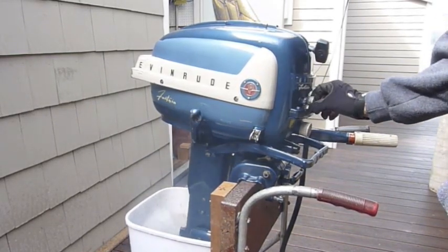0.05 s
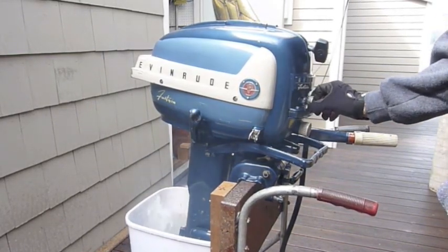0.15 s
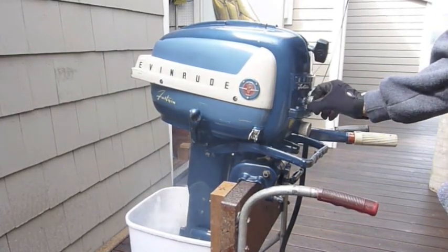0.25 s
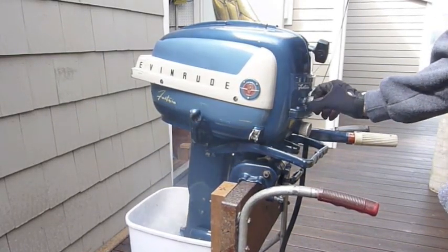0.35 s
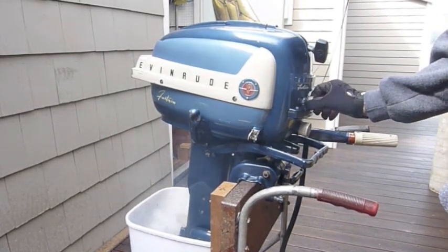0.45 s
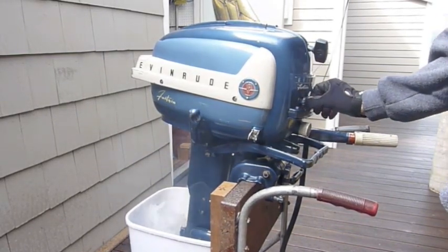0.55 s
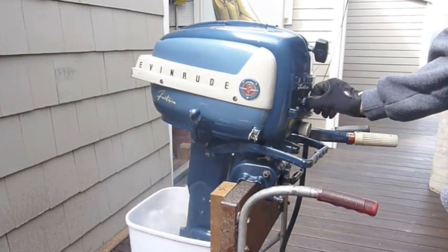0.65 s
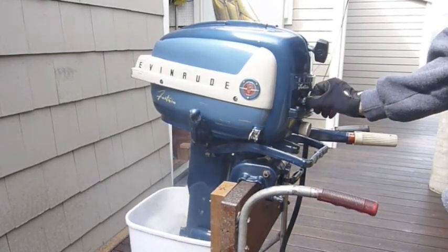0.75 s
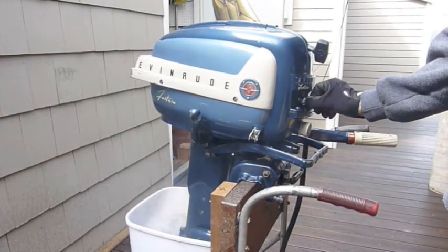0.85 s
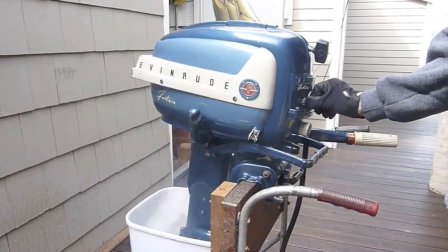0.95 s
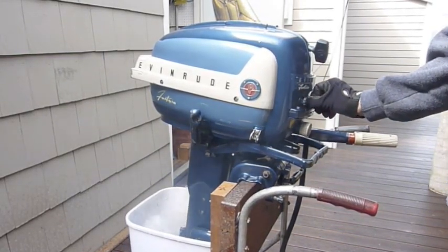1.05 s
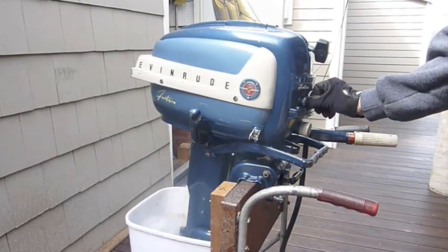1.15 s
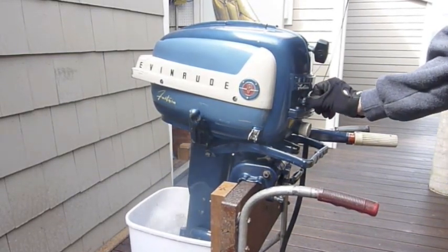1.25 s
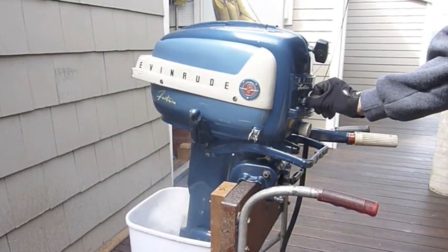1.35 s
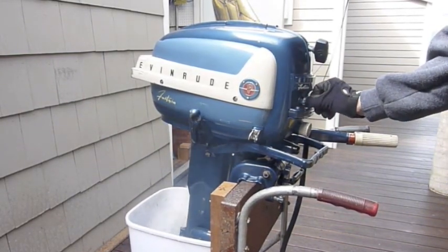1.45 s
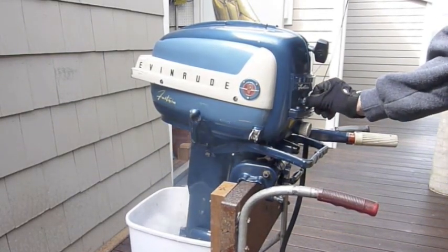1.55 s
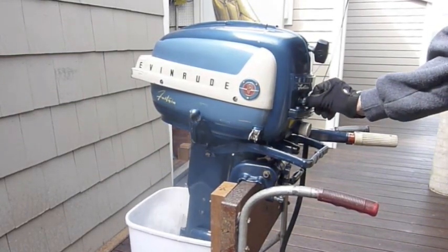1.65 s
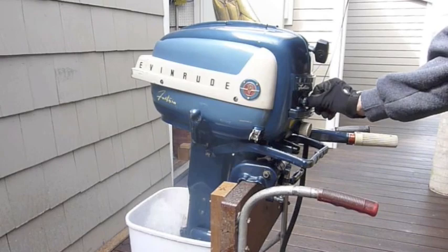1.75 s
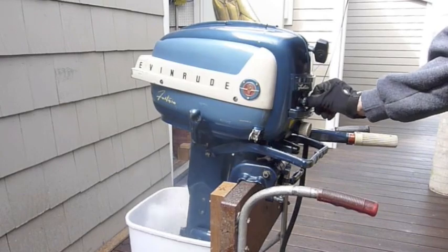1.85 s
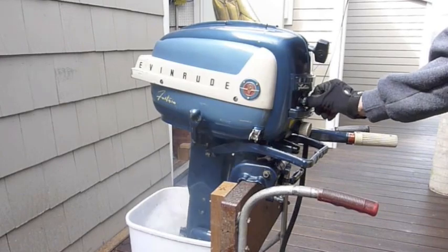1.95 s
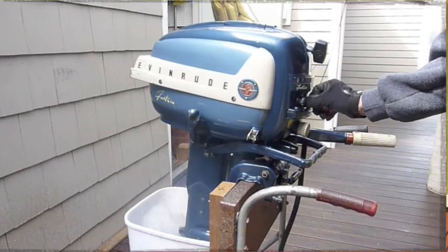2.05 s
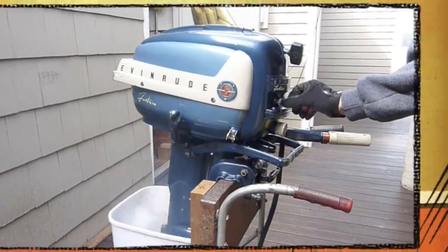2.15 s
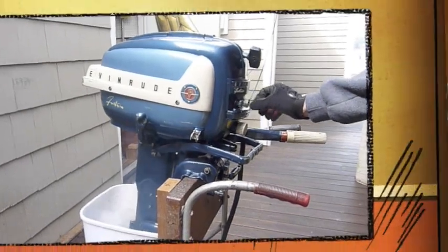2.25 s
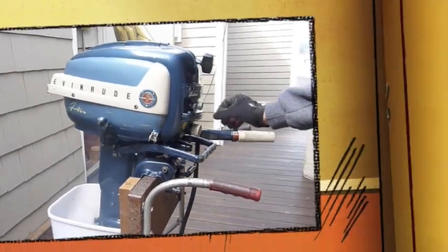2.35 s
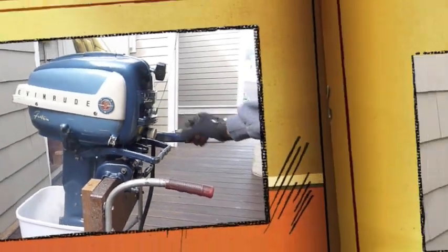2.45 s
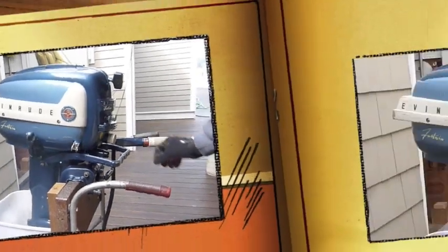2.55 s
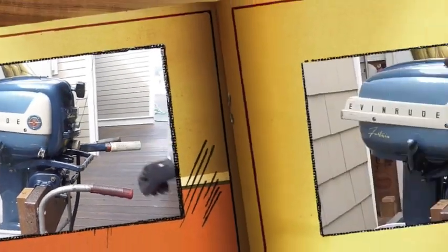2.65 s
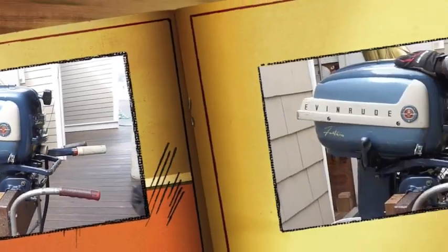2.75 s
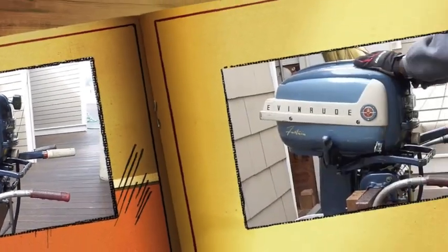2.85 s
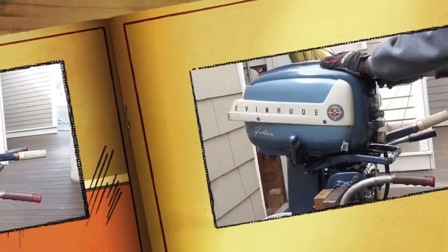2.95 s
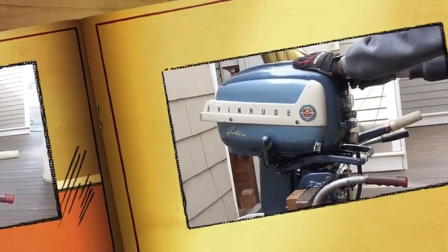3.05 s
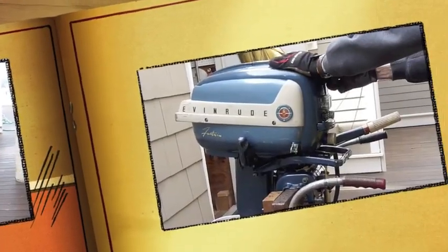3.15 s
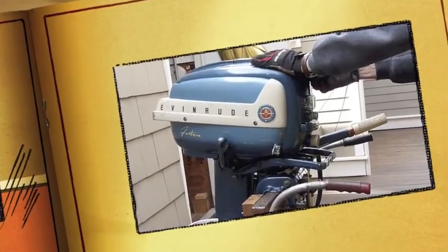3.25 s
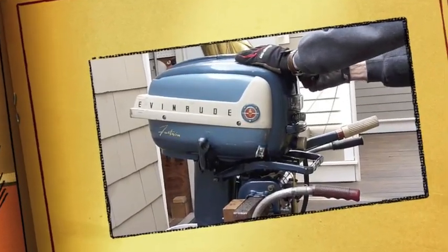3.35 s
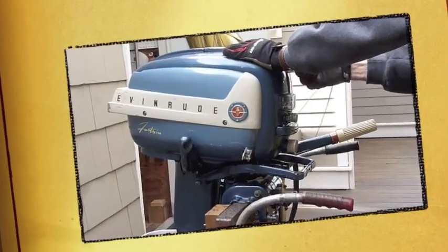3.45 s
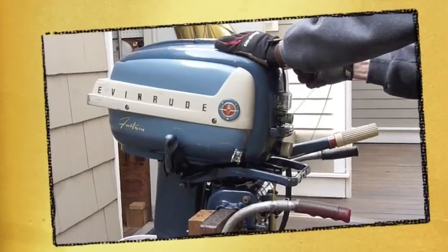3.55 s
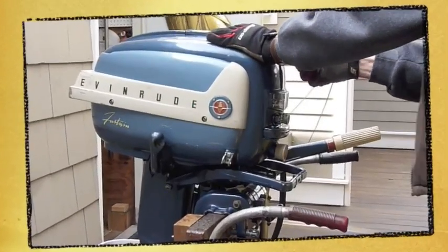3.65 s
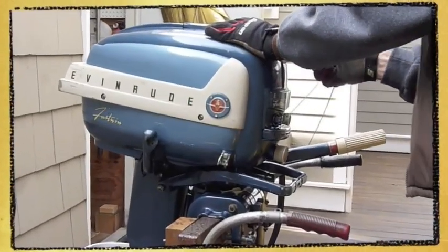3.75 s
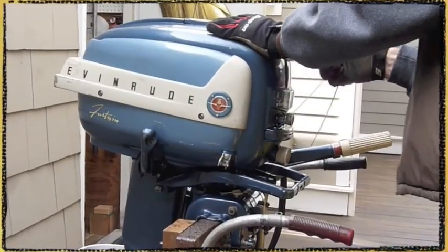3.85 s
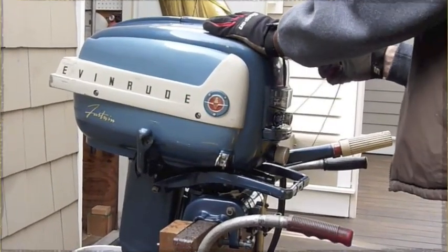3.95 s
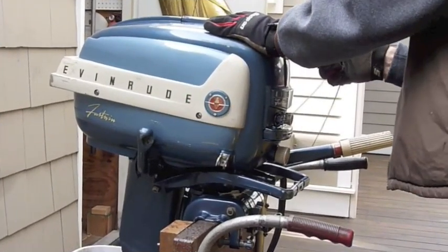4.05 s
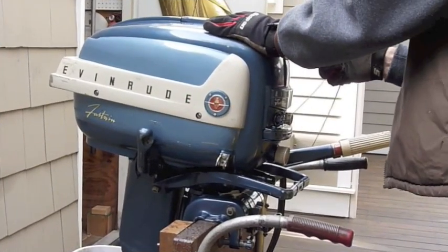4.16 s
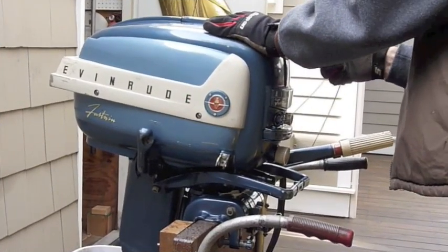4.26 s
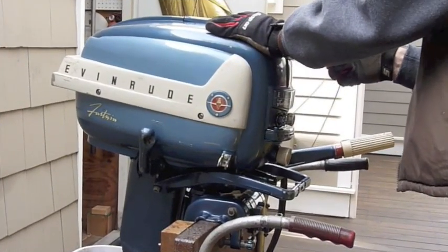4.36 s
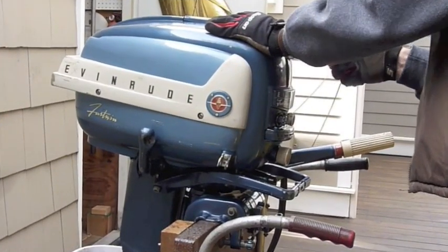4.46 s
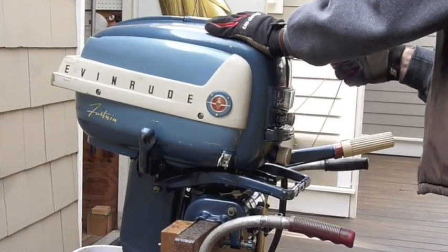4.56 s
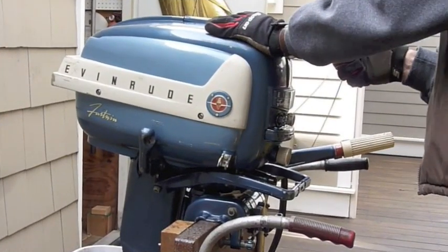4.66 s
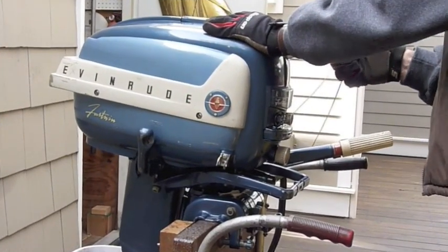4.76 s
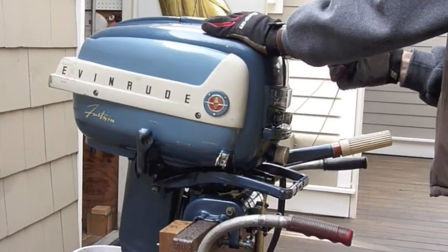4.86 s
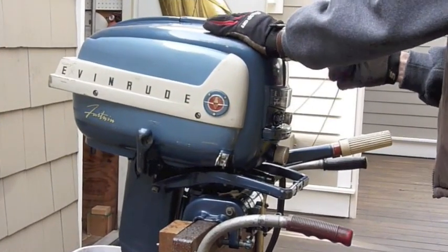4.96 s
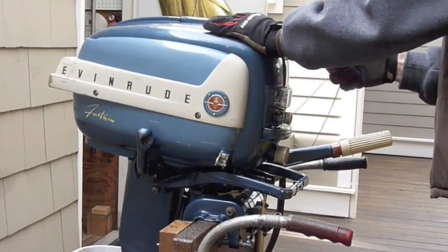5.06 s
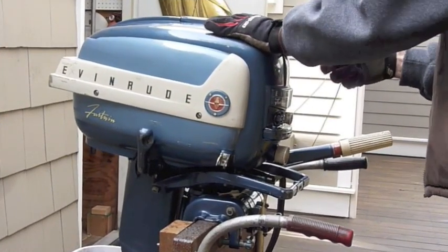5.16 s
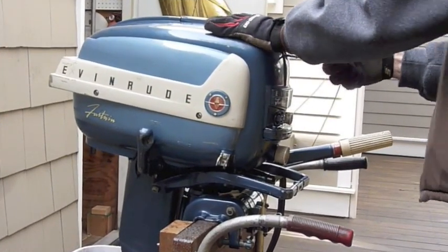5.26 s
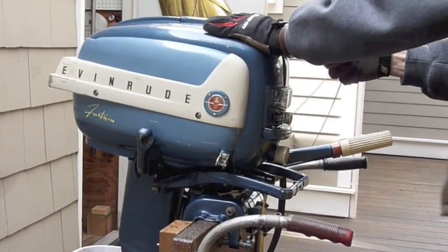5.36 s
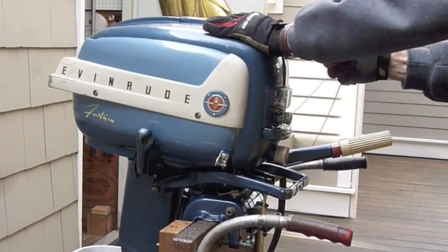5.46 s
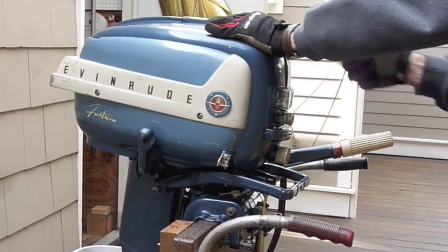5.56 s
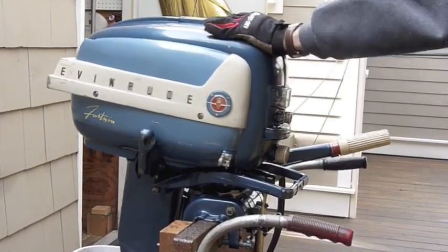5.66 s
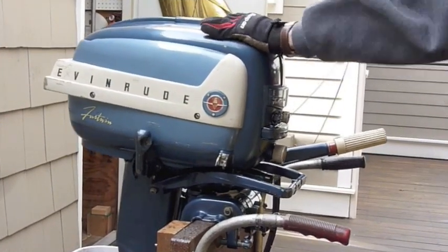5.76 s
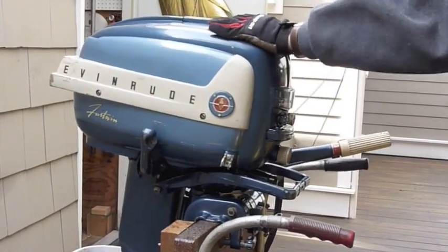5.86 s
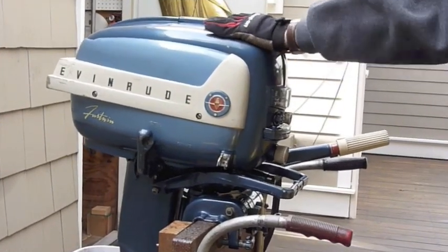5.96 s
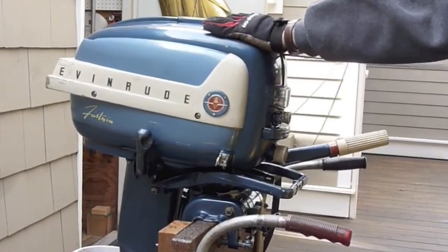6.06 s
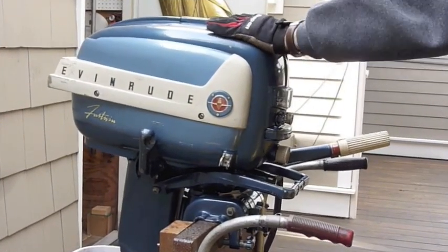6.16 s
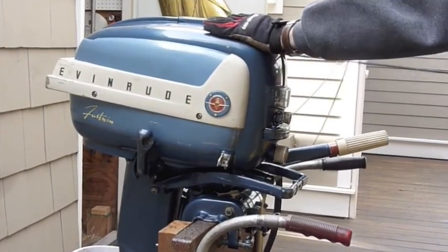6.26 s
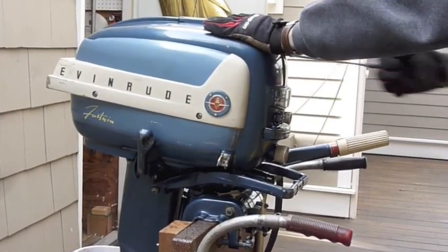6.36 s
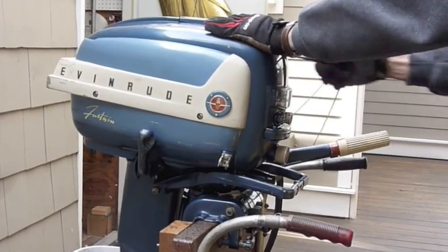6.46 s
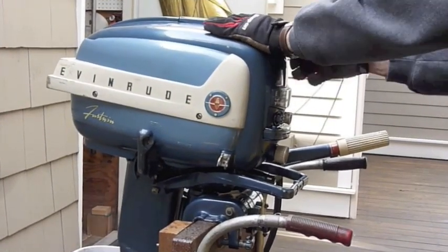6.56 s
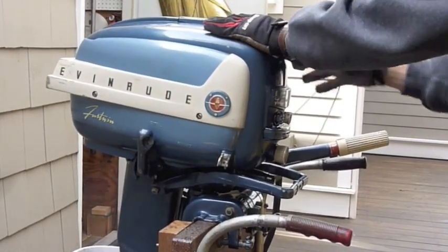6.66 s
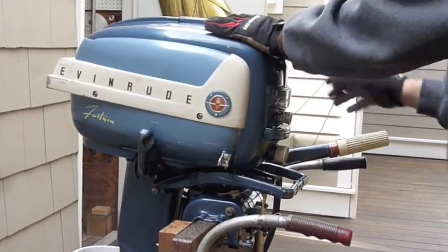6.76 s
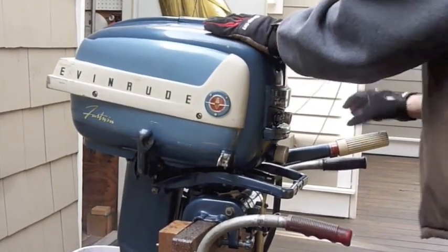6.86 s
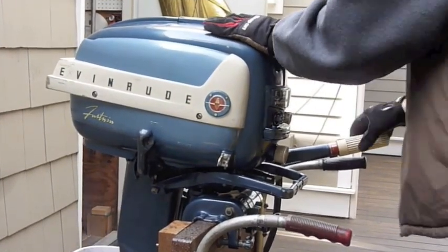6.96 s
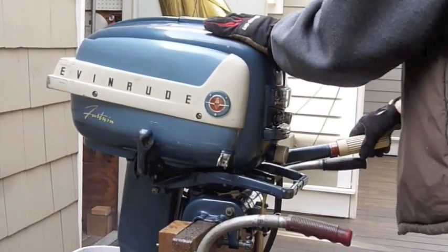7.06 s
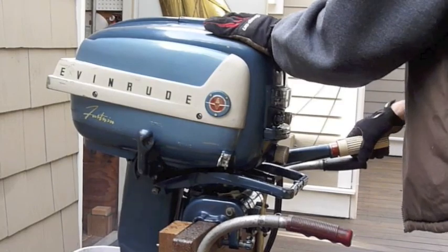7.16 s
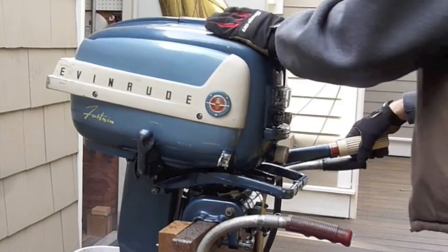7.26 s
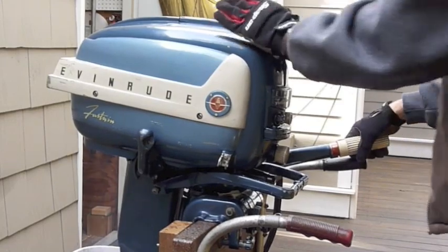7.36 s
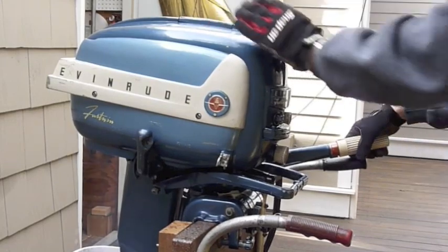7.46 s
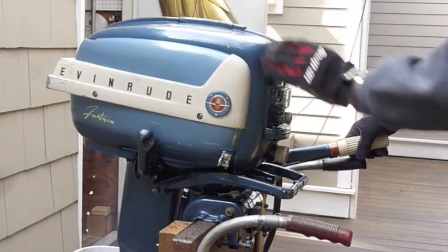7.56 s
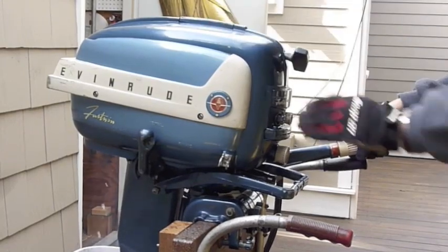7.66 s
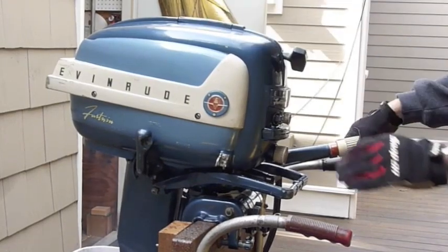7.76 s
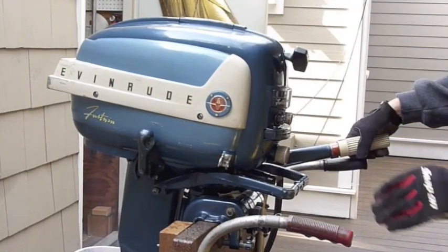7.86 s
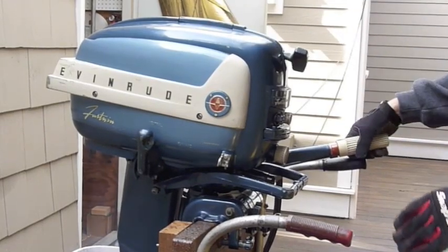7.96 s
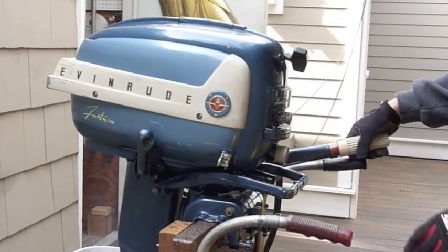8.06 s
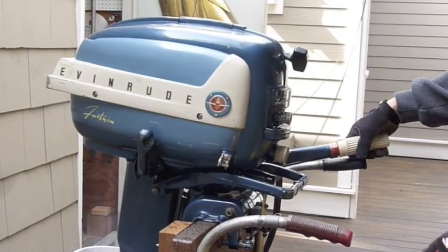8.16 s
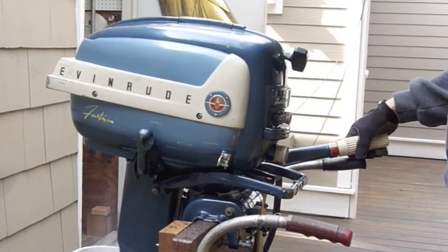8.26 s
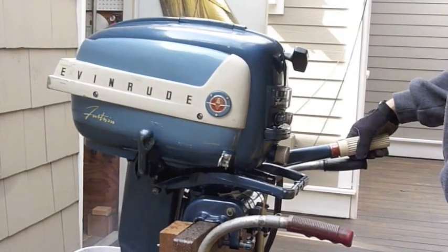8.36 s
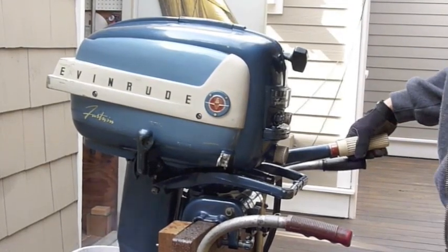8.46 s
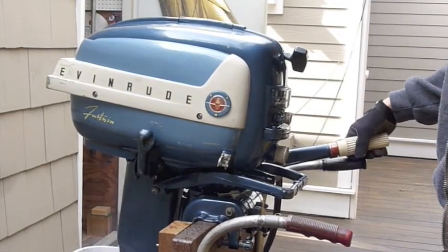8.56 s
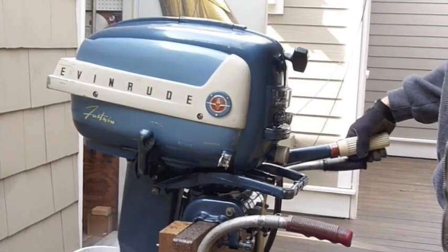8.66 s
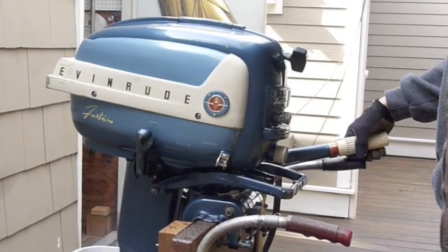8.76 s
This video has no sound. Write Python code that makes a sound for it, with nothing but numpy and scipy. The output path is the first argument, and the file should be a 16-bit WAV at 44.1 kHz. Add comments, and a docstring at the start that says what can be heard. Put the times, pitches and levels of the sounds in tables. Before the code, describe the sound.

Metal rattles and exhaust gurgles through water as a small outboard motor ticks over in a tub beside a house wall. The sound fades out, leaving a quiet gap with soft handling scrapes. Then, nearer the microphone, a starter bites and cranks with a few hard clacks. The engine fires, speeds up slightly and drops back to an uneven, stumbling idle with splashy glugs.

```python
"""A twin two-stroke outboard idles in a tub of water beside a house wall, then fades out.
The sound fades back in, closer, on the stopped motor: a hand works the controls, the electric
starter grinds, the motor catches, races a little and settles to a lumpy idle.
Each firing is a clatter of metal under the cowl and an exhaust puff gurgling through the tub."""
import sys
import numpy as np
from scipy import signal
from scipy.io import wavfile

SR = 44100
rng = np.random.default_rng(int(sys.argv[2]) if len(sys.argv) > 2 else 0)


def to_wav(sig):
    """Store sig (one row per channel, or 1-D mono) as 16-bit WAV at the path in sys.argv[1].

    Samples outside -1..1 are clipped; the rate is SR.
    """
    pcm = np.clip(np.atleast_2d(sig), -1, 1) * 32767
    pcm = np.round(pcm).astype(np.int16)
    wavfile.write(sys.argv[1], SR, pcm.T)  # frames by channels


N = 388080
TIME = np.arange(N) / SR
FADE_BOTTOM_S = 3.099

# firings that catch hard: t/s, relative level/dB
HARD_FIRINGS = [(.423, -15), (.655, -14), (1.238, -11), (1.77, -13), (1.946, -14), (2.085, -16.5),
                (6.191, -15), (6.229, -11.5), (6.283, -11.5), (6.42, -10.5), (6.559, -12.5), (6.595, -13),
                (6.798, -12.5), (6.862, -11), (7.007, -10.5), (7.154, -11.5), (7.227, -13.5),
                (7.306, -13.5), (7.463, -15), (7.623, -14), (7.821, -13), (7.86, -14), (8.029, -12.5),
                (8.205, -10.5), (8.376, -11), (8.45, -12), (8.488, -12), (8.62, -13), (8.78, -13)]
# cowl modes: f/Hz, half-width/Hz, lift/dB
COWL_MODES = [(1130, 35, 3), (1365, 70, 4), (1860, 70, 2), (2650, 90, 3), (3070, 70, 2), (3390, 90, 4),
              (3655, 55, 3), (4220, 80, 3), (6240, 90, 2)]


def amp(db):
    return 10 ** (np.asarray(db) / 20)


def curve(rows, t):
    """Linear interpolation of rows of t/s, value."""
    return np.interp(t, *np.transpose(rows))


def add(mix, at_s, sound):
    part = mix[max(round(at_s * SR), 0):][:len(sound)]
    part += sound[:len(part)]


def body(x, colour, modes=()):
    """Ring x through a minimum-phase body of unit power: broad colour plus narrow modes."""
    freqs = np.fft.rfftfreq(16384, 1 / SR)
    hz, db = np.transpose(colour)
    db = np.interp(np.log(freqs + 1), np.log(hz), db)
    for centre, half_width, lift in modes:
        db = db + lift / (1 + ((freqs - centre) / half_width) ** 2)
    log_gain = np.log(amp(np.r_[db, db[-2:0:-1]]))
    ring = np.fft.ifft(np.exp(signal.hilbert(log_gain).conj())).real[:len(db)]
    return signal.oaconvolve(x, ring / np.linalg.norm(ring))[:N]


def impacts(per_s, spread_db):
    """Dense hail of small, uneven impacts at unit rms."""
    size = rng.standard_normal(N) * amp(spread_db * np.clip(rng.standard_normal(N), -2, 2))
    hail = size * (rng.random(N) < per_s / SR)
    return hail / np.sqrt(np.mean(hail ** 2) + 1e-20)


def crank(speed, first_s, jitter_s):
    """Running firing count and the slightly uneven firing times."""
    cycles = np.cumsum(curve(speed, TIME)) / SR
    cycles -= np.interp(first_s, TIME, cycles)
    total = np.interp(speed[-1][0], TIME, cycles)
    fires_s = np.interp(np.arange(total), cycles, TIME)
    return cycles, fires_s + jitter_s * rng.standard_normal(len(fires_s))


def clatter(fires_s, colour, db, rise_s, decay_s, rattle, hollow_s, knock, scatter_db, hard_db):
    """Firings snap at pistons and loose metal; the hollow cowl answers; gears rattle in between."""
    t = np.arange(SR // 10) / SR
    snap = (1 - np.exp(-(t / rise_s) ** 2)) * np.exp(-t / decay_s)
    swell = t / hollow_s * np.exp(-t / hollow_s)
    snaps, swells, knocks = np.zeros((3, N))
    draws = np.clip(rng.standard_normal((len(fires_s), 4)), -2, 2)
    for s, (size, depth, force, late) in zip(fires_s, draws):
        jolt_db = hard_db * any(abs(s - at_s) < .02 for at_s, _ in HARD_FIRINGS)
        add(snaps, s, amp(jolt_db + scatter_db * size) * snap)
        add(swells, s, amp(jolt_db + scatter_db * (size + depth) / np.sqrt(2)) * swell)
        add(knocks, s + rise_s * (1 + 0.54 * late), np.array([knock * amp(2 * force)]))
    running = (TIME > fires_s[0] - .01) & (TIME < fires_s[-1] + .06)
    bright = (snaps + rattle * running) * impacts(per_s=9000, spread_db=0.5) + knocks
    hollow = (swells + 0.66 * running) * rng.standard_normal(N)
    ringing = clinks(fires_s + rise_s)
    bright, hollow, ringing = (x / np.std(x[running]) for x in (bright, hollow, ringing))
    highs = signal.lfilter(*signal.butter(2, 2000, "high", fs=SR), bright)
    lows = signal.lfilter(*signal.butter(2, 2000, fs=SR), hollow)
    return amp(db) * (body(highs + lows, colour, COWL_MODES) + amp(-15.5) * ringing)


def clinks(times_s, spread_db=9.5):
    """Each stroke rings the cowl modes in a different mix."""
    hz, half_width, lift = np.transpose(COWL_MODES)[:, :, None]
    t, out = np.arange(SR // 12) / SR, np.zeros(N)
    envelopes = np.exp(-np.pi * half_width * t / 2) * (1 - np.exp(-t / 0.0012))
    rings = amp(lift) * np.minimum(hz / 3000, 1) * envelopes
    for s, (size, phase) in zip(times_s, rng.standard_normal((len(times_s), 2, len(hz), 1))):
        gains = amp(spread_db * np.clip(size, -2, 2))
        add(out, s, (gains * rings * np.sin(2 * np.pi * (hz * t + phase))).sum(0))
    return out


def exhaust(fires_s, puff_db, colour, modes, hard_db, lag_s, gurgle, gurgle_s, slap_s, scatter_db):
    """Each firing puffs down the leg; the water slaps back and gurgles; the tub rings."""
    times_s = fires_s + lag_s
    size_db = puff_db + scatter_db * np.clip(rng.standard_normal(len(fires_s)), -2, 1)
    for s, level_db in HARD_FIRINGS:
        size_db[abs(times_s - s) < .02] = level_db + hard_db
    t, drive = np.arange(SR // 12) / SR, np.zeros(N)
    for s, level_db in zip(times_s, size_db):
        bubbles = rng.standard_normal(len(t)) * np.exp(-t / gurgle_s)
        puff = gurgle * bubbles / np.linalg.norm(bubbles)
        puff[0] += 1  # gas pulse
        puff[round(slap_s * SR)] += 0.39
        add(drive, s, amp(level_db) * puff / np.linalg.norm(puff))
    period = np.mean(np.diff(fires_s)) * SR  # one puff carries a whole period's energy
    return body(drive, colour, modes) * np.sqrt(period)


def walls(x, db, t60_s):
    """Deck and house walls return a short scatter of echoes."""
    t = np.arange(SR // 3) / SR
    taps = rng.choice([-1, 1], len(t)) * (rng.random(len(t)) < 2000 / SR)
    echoes = taps * (t > .004) * 10 ** (-3 * t / t60_s)
    return amp(db) * signal.oaconvolve(x, echoes / np.linalg.norm(echoes))[:N]


def shake(cycles, orders, waver=0.55):
    """The motor rocks unevenly on its stand at low multiples of the firing rate."""
    knots_s, out = np.arange(0, TIME[-1] + .1, .1), np.zeros(N)
    for order, db in orders:
        sway = 1 + waver * np.interp(TIME, knots_s, rng.standard_normal(len(knots_s)))
        out += amp(db) * sway * np.sin(2 * np.pi * (order * cycles + rng.random()))
    return np.sqrt(2) * out


def idle():
    """The motor ticks over, exhaust bubbling loosely, until the bottom of the fade."""
    # engine speed: t/s, firing rate/Hz
    speed = [(0.0, 21.75), (0.4, 22.25), (0.6, 21.25), (1.05, 22.94), (1.55, 22.39), (3.1, 22.96)]
    # spectra of the clatter and of the path through leg and tub: f/Hz, relative level/dB
    metal_colour = [(30, -32.5), (85, -13), (130, 4), (400, 5), (700, -0.5), (1300, -3.5), (2000, -5.5),
                    (3500, -8), (5000, -7.5), (6500, -10), (7200, -15.5), (8200, -46)]
    pipe_colour = [(85, -33.5), (110, -2), (340, 2), (420, -10), (700, -6.5), (1400, -48.5)]
    # leg and tub modes: f/Hz, half-width/Hz, lift/dB
    tub_modes = [(113, 6, 6), (178, 14, 7), (238, 10, 11.5), (325, 13, 12.5), (465, 14, 7), (610, 25, 4)]
    # rocking: multiple of firing rate, level/dB
    orders = [(1, -62), (2, -50.5), (3, -62.5), (4, -53.5)]
    cycles, fires_s = crank(speed, first_s=.012, jitter_s=.0005)
    metal = clatter(fires_s, metal_colour, db=-25.5, rise_s=.0035, decay_s=0.0082, rattle=0.2,
                    hollow_s=0.0055, knock=0.9, scatter_db=1.0, hard_db=2.5)
    puff_db = np.interp(fires_s, [0, 0.98], [-32, -28.5])  # builds, then holds
    gas = exhaust(fires_s, puff_db, pipe_colour, tub_modes, hard_db=-12.5, lag_s=0.00889,
                  gurgle=1.1, gurgle_s=.026, slap_s=0.01276, scatter_db=2.5)
    motor = metal + gas
    return (motor + walls(motor, db=-11.5, t60_s=0.13) + shake(cycles, orders)) * (TIME < FADE_BOTTOM_S)


def air():
    """Soft outdoor wash."""
    # background spectrum: f/Hz, relative level/dB
    colour = [(15, -39), (25, -18), (60, -3), (204, -2), (385, -4.5), (444, -3), (476, -3.5), (763, -7),
              (1040, -11), (1910, -13.5), (7000, -23.5), (9100, -61), (15400, -120)]
    return amp(-56) * body(rng.standard_normal(N), colour)


def glugs(db=-5.0, low_hz=320, high_hz=900, decay_s=0.0046, spread_s=.05, count=9):
    """A hard firing bursts a cluster of big bubbles at the surface, each rising in pitch."""
    t, out = np.arange(SR // 20) / SR, np.zeros(N)
    envelope = np.exp(-t / decay_s) * (1 - np.exp(-t / 0.00095))
    for s, level_db in HARD_FIRINGS:
        for late, pitch in rng.random((count, 2)):
            hz = low_hz * (high_hz / low_hz) ** pitch
            bubble = np.sin(2 * np.pi * hz * t * (1 + 2 * t)) * envelope
            add(out, s + spread_s * late ** 1.4, amp(level_db + db) * low_hz / hz * bubble)
    return out


def scrapes_and_cranking_clacks():
    """Soft scrapes of a hand on the controls; sharp compression clacks as the motor is cranked."""
    # scrapes and clacks: t/s, level/dB, rise/s, decay/s
    events = [(3.29, -50.5, .003, .01), (3.456, -44.5, 0.0048, 0.033), (3.492, -42, 0.0033, .01),
              (3.745, -45, 0.024, 0.052), (5.11, -54, 0.056, .19), (5.325, -53, 0.015, .03),
              (5.435, -44, .0005, 0.026), (5.558, -54, .002, .06), (5.712, -27.5, 0.0057, 0.072),
              (5.806, -16.5, .001, 0.016), (5.947, -27, .002, .02), (6.049, -25, .001, 0.018),
              (6.147, -24.5, 0.0011, 0.033)]
    # their spectrum: f/Hz, relative level/dB
    colour = [(40, -21), (400, 4), (1200, 3.5), (2500, -0.5), (6800, -3), (8000, -38.5)]
    t, force = np.arange(SR // 2) / SR, np.zeros(N)
    for s, db, rise_s, decay_s in events:
        add(force, s, amp(db) * (1 - np.exp(-t / rise_s)) * np.exp(-t / decay_s))
    return body(force * rng.standard_normal(N), colour)


def starter(catch_s, whir_s=5.56, bite_s=5.748, rise_s=0.019, ease_s=0.026, drop_out_s=0.023):
    """The pinion whirs, bites, cranks and drops out; its teeth ring the flywheel like a dull gong."""
    # gear noise spectrum: f/Hz, relative level/dB
    colour = [(40, -27), (200, -5), (800, 10), (1500, -2.5), (3000, 2.5), (8000, -29)]
    # flywheel modes: f/Hz, half-width/Hz, lift/dB
    flywheel_modes = [(574, 21, 15), (749, 16, 12), (1119, 43, 13), (1333, 25, 10), (1580, 30, 15),
                      (2014, 33, 13.5), (2170, 30, 13)]
    since_s = TIME - bite_s
    bite = np.exp(-np.maximum(-since_s / rise_s, since_s / ease_s))
    force = amp(-54) * (TIME > whir_s) + amp(-15.5) * bite + amp(-38.5) * (since_s > 0)
    engaged = np.exp(-np.maximum(TIME - catch_s, 0) / drop_out_s)
    return body(force * engaged * impacts(per_s=2900, spread_db=-1.5), colour, flywheel_modes)


def restart_puff_db(fires_s, speed, catch_s, pump_db=-41, run_db=-26, stumble_db=-5.5):
    """Pistons only pump air until the catch; then puffs grow with speed and weaken in stumbles."""
    # stumble centres: t/s
    stumbles_s = [7.40, 7.555, 7.96, 8.135, 8.55, 8.715]
    over_idle_hz = curve(speed, fires_s) - 23.4
    stumbling = (abs(fires_s[:, None] - stumbles_s) < .095 / 2).any(1)
    return np.where(fires_s < catch_s, pump_db, run_db + 0.36 * over_idle_hz + stumble_db * stumbling)


def restart(catch_s=6.17):
    """The motor is cranked, catches and runs with harder, cleaner puffs."""
    # engine speed: t/s, firing rate/Hz
    speed = [(5.7, 26.38), (5.9, 25.65), (6.05, 18.04), (6.2, 25.14), (6.6, 29.93), (7.35, 25.98),
             (8.2, 23.05), (8.5, 24.8), (8.8, 23.32)]
    # close-up spectra of the clatter and of the path through leg and tub: f/Hz, relative level/dB
    metal_colour = [(30, -26), (110, -3.5), (190, 5.5), (400, 2), (700, 0), (1300, -0.5), (2000, -4.5),
                    (3500, -7), (5000, -7), (6500, -7), (7200, -12), (8200, -44)]
    pipe_colour = [(120, -15), (185, -5.5), (215, -1), (400, 2), (680, -10.5), (1400, -52)]
    # leg and tub modes: f/Hz, half-width/Hz, lift/dB
    tub_modes = [(218, 9, 11), (240, 9, 12.5), (297, 9, 11), (340, 11, 5), (525, 16, 3)]
    # rocking: multiple of firing rate, level/dB
    orders = [(1, -61), (2, -49.5), (3, -47.5), (4, -44), (5, -46)]
    cycles, fires_s = crank(speed, first_s=5.7175, jitter_s=.0003)
    metal = clatter(fires_s, metal_colour, db=-27.0, rise_s=.0036, decay_s=0.013, rattle=0.33,
                    hollow_s=0.0077, knock=1.8, scatter_db=3.0, hard_db=0.5)
    puff_db = restart_puff_db(fires_s, speed, catch_s)
    gas = exhaust(fires_s, puff_db, pipe_colour, tub_modes, hard_db=-9.5, lag_s=0.00293,
                  gurgle=.8, gurgle_s=.017, slap_s=.0168, scatter_db=-0.3)
    hand_db = np.interp(TIME, [7.38, 7.48], [-1.33, 0])  # a hand damps the cowl until lifted
    motor = metal * amp(hand_db) + gas + starter(catch_s) + scrapes_and_cranking_clacks()
    spun_up = np.clip((TIME - 5.75) / .5, 0, 1)
    return motor + walls(motor, db=-7.5, t60_s=0.43) + spun_up * shake(cycles, orders)


def scene():
    """Idle, restart, big bubbles and open air, in mono."""
    return (idle() + restart() + glugs() + air())[None]


def record(dry):
    """Fade out and back in, two narrow notches, band limit."""
    # notches: f/Hz, half-width/Hz
    notches = [(5410, 183), (7700, 81)]
    fade_s, edge_hz = 0.93, 8200
    x = dry * np.clip(abs(TIME - FADE_BOTTOM_S) / fade_s, 0, 1)
    for hz, half_width in notches:
        x = signal.lfilter(*signal.iirnotch(hz, hz / (2 * half_width), fs=SR), x)
    lowpass = signal.firwin(401, edge_hz, window=("kaiser", 8), fs=SR)
    return signal.oaconvolve(x, lowpass[None], "same")


dry = scene()
out = record(dry)
to_wav(out)
```